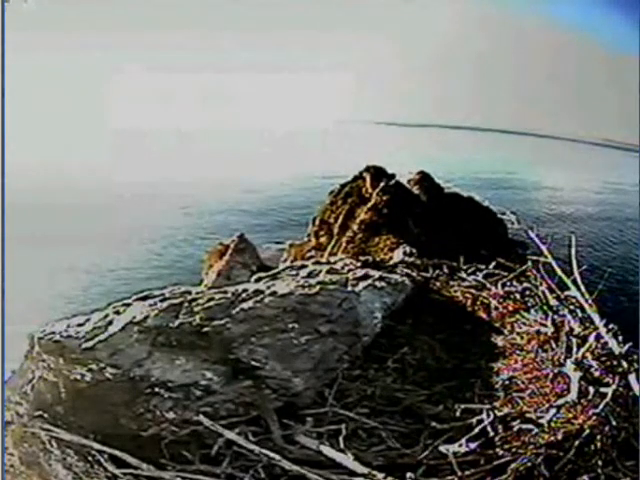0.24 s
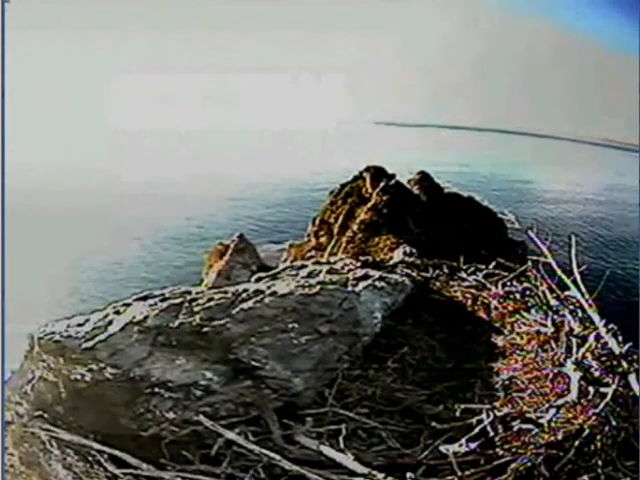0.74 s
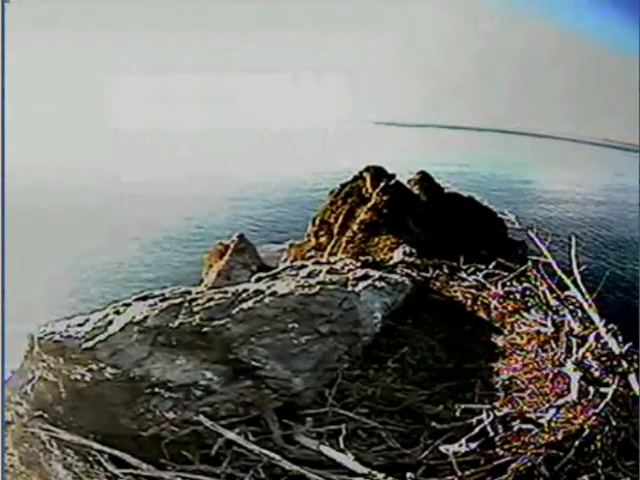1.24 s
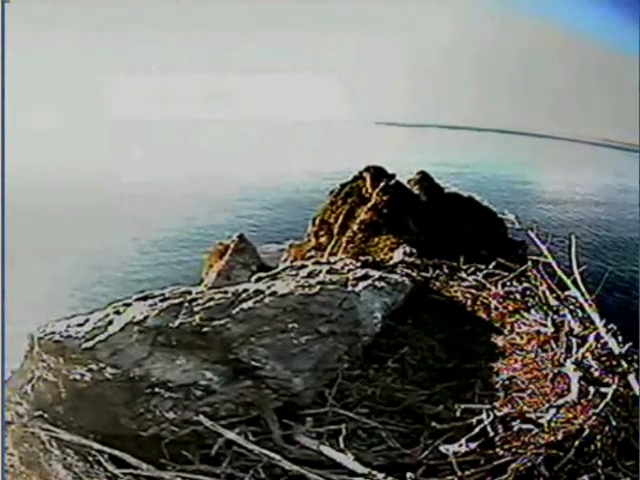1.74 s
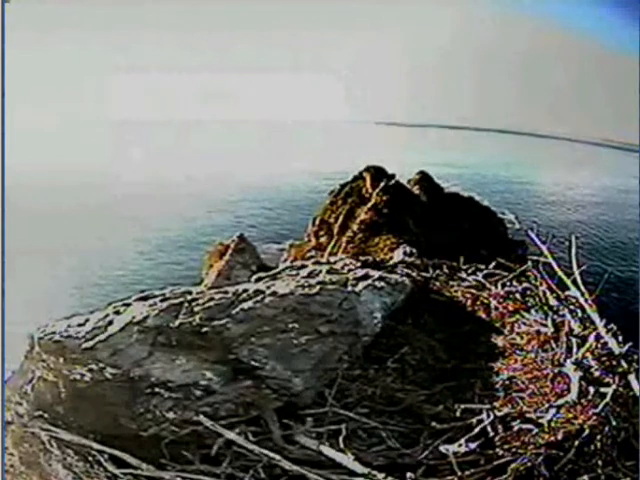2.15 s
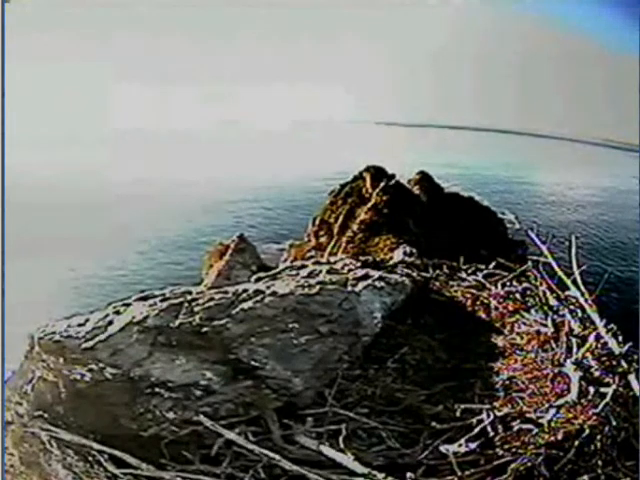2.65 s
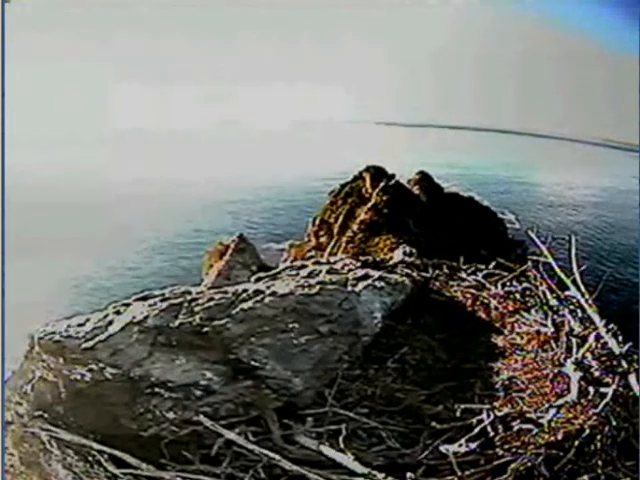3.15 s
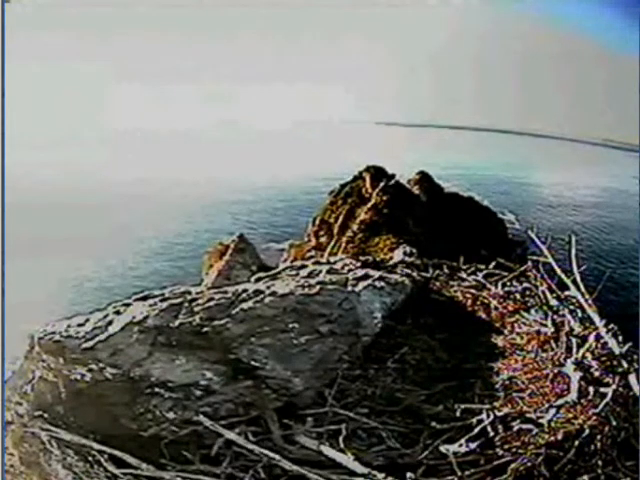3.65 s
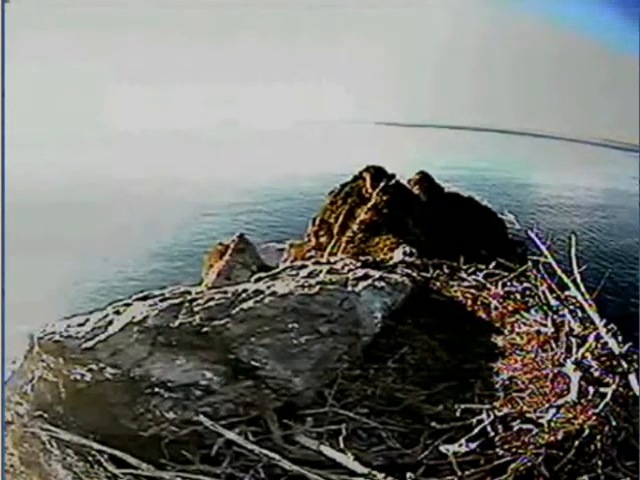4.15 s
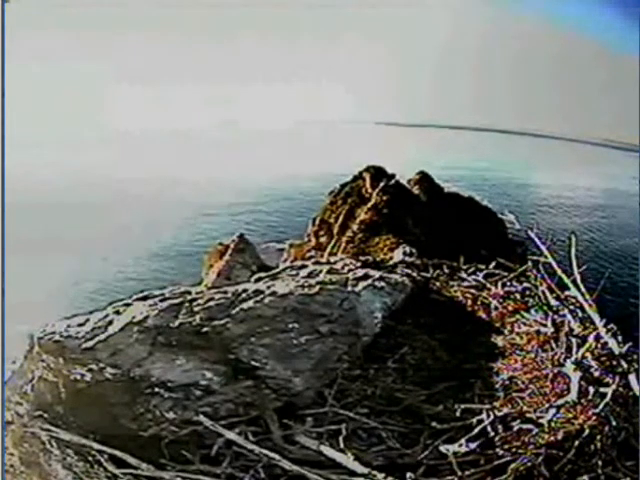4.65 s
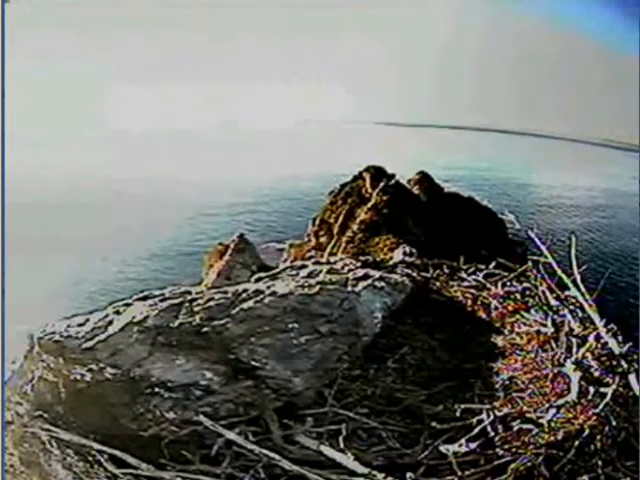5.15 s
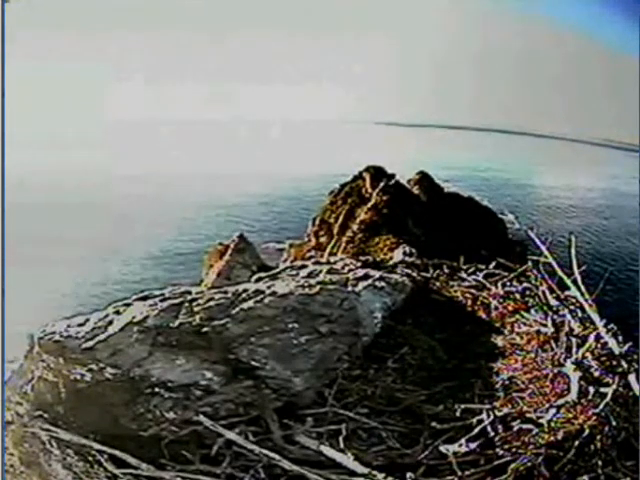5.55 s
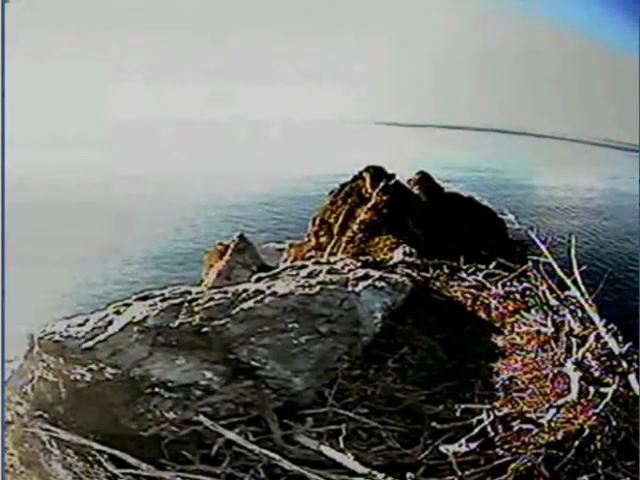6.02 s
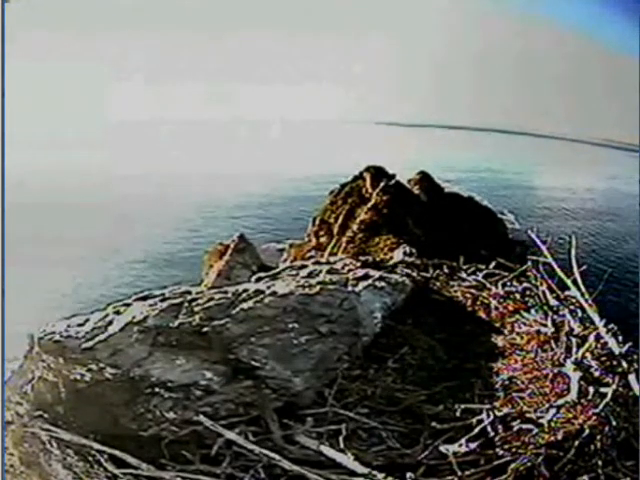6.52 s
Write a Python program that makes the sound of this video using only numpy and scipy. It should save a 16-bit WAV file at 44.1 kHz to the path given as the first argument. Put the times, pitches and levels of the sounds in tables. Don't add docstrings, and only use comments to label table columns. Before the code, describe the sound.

Two eagles swap thin high chirps and jumping whistles in quick runs over steady surf hiss, after one abrupt noisy blare near the start.

```python
import sys
import numpy as np
from scipy import signal
from scipy.io import wavfile
from scipy.ndimage import uniform_filter1d, minimum_filter1d

SR = 44100
rng = np.random.default_rng(int(sys.argv[2]) if len(sys.argv) > 2 else 0)


def wrap_up_sound(samples):
    columns = np.atleast_2d(samples).T
    tamed = np.clip(columns, -1, 1)
    steps = np.round(tamed * 32767).astype(np.int16)
    wavfile.write(sys.argv[1], SR, steps)


def volts_from_db(level):
    exponent = np.asarray(level, float) / 20
    return 10 ** exponent


N = 298998


def evened(x):
    return x / np.sqrt(np.mean(x ** 2) + 1e-20)


def read(points, hz):
    f, value = np.transpose(points)
    return np.interp(np.log(hz + 1), np.log(f + 1), value)


def add(mix, s, sound):
    part = mix[round(s * SR):][:len(sound)]
    part += sound[:len(part)]


def swing(s, per_s):
    return np.sin(2 * np.pi * (per_s * rng.uniform(.5, 1) * s + rng.random()))


def noise(spectrum, patchy_db, swell_db):
    frames, hz = N // 256 + 5, np.fft.rfftfreq(1024, 1 / SR)
    real, imaginary, patches = rng.standard_normal((frames, 513, 3)).T
    patches = uniform_filter1d(patches, size=8, axis=0)
    patches = evened(uniform_filter1d(patches, size=10, axis=1))
    swell = evened(uniform_filter1d(rng.standard_normal(frames), size=12))
    level_db = read(spectrum, hz)[:, None] + patchy_db * patches + swell_db * swell
    spectra = (real + 1j * imaginary) * volts_from_db(level_db)
    return evened(signal.istft(spectra, nperseg=1024, noverlap=768)[1][:N])


def note(rows, waver=.003, edge_s=.002):
    s, hz, *partial_db = np.transpose(rows)
    t = np.arange(s[0], s[-1], 1 / SR)
    wobble = evened(uniform_filter1d(rng.standard_normal(SR), size=200))[:len(t)]
    turns = np.cumsum(np.interp(t, s, hz) * (1 + waver * wobble)) / SR
    tone = np.zeros(len(t))
    for k, db in enumerate(partial_db, start=1):
        tone += volts_from_db(np.interp(t, s, db)) * np.sin(2 * np.pi * k * turns)
    edges = np.clip(np.minimum(t - s[0], s[-1] - t) / edge_s, 0, 1)
    return s[0], np.sqrt(2) * tone * edges


# pitch_hz, density_db (per Hz)
RUMBLE = [(8.8, -30.5), (15, 0), (19, -2), (22, -13), (32, -1.5), (65, -19), (200, -13.5), (260, -39),
          (440, -120)]
RUMBLE_DB = -49


def wind_rumble():
    return volts_from_db(RUMBLE_DB) * noise(RUMBLE, patchy_db=2.0, swell_db=-1.5)


# time_s, level_db
SURF_LEVEL = [
    [(0.0, -36), (0.34, -35)],
    [(0.42, -36.5), (0.52, -38), (1.91, -37), (2.19, -36.5), (2.76, -36.5), (3.31, -36), (3.71, -36.5),
     (3.93, -37.5), (5.04, -38.5), (5.5, -38.5), (6.37, -41), (6.78, -40.5)],
]


def surf_db(t):
    return np.interp(t, *np.transpose(SURF_LEVEL[0] + SURF_LEVEL[1]))


# pitch_hz, density_db (per Hz)
SURF = [(140, -40.5), (240, -8.5), (406, -6), (517, -8), (885, -5), (1180, 2.5), (1540, -9.5), (1670, -16),
        (2760, -16), (3110, -10.5), (3590, -29), (4200, -32.5), (5460, -61.5), (9240, -120)]
# time_s, pitch_hz, level_db
HOUSING_RING = [
    [(.363, 1140, -27), (.368, 1180, -6), (.3725, 1190, -22)],
    [(.3735, 1250, -15), (.377, 1250, -11), (.3858, 1230, -11)],
]
# start_s, end_s, gain_db
BLARE = (.3626, .3858, 20.6)


def surf():
    sea = volts_from_db(surf_db(np.arange(N) / SR)) * noise(SURF, patchy_db=0.8, swell_db=0.61)
    for rows in HOUSING_RING:
        s, ring = note(rows, waver=0.02, edge_s=0.0057)
        add(sea, s, ring * volts_from_db(-BLARE[2]))
    return sea


# pitch_hz, overtone_db (over the first partial)
SECOND_PARTIAL = [(1300, -2.5), (1900, 1.5), (2150, -23.5), (2450, -23.5), (2700, -31), (2800, -20),
                  (3220, -22), (3340, -43)]
THIRD_PARTIAL = [(1300, -18), (1900, -8.5), (2250, -41.5)]
# start_s, end_s
FACING_AWAY = (3.0, 4.5)
AWAY_ABOVE_HZ, AWAY_DB_PER_KHZ = 3500, -7.5
BEAK_WANDER_DB, BEAK_PER_S = 1, 22


def voiced(s, hz, db, beak_db=None):
    if beak_db is None:
        beak_db = BEAK_WANDER_DB * swing(s, BEAK_PER_S)
    away = AWAY_DB_PER_KHZ / 1000 * (FACING_AWAY[0] < s[0] < FACING_AWAY[1])
    second_db = away * np.maximum(2 * hz - AWAY_ABOVE_HZ, 0) + db + beak_db + read(SECOND_PARTIAL, hz)
    third_db = away * np.maximum(3 * hz - AWAY_ABOVE_HZ, 0) + db + beak_db + read(THIRD_PARTIAL, hz)
    return np.transpose([s, hz, db, second_db, third_db])


# start_s, end_s, from_hz, to_hz, level_db
FAR_WHISTLES = [
    (0.481, .87, 5380, 5340, -68),
    (4.373, 4.71, 5420, 5380, -67.5),
    (6.293, 6.654, 5450, 5180, -67),
]
# start_s, end_s, from_hz, to_hz, level_db
WHISTLES = [
    (1.634, 1.68, 3206, 3060, -38.5),
    (1.681, 1.753, 3210, 3310, -35.5),
    (2.281, 2.308, 1270, 1280, -37.5),
    (2.295, 2.324, 1330, 1320, -36),
    (2.321, 2.345, 2290, 2280, -41),
    (3.111, 3.268, 1275, 1326, -41),
    (3.914, 4.044, 1322, 1360, -39),
    (4.047, 4.147, 1936, 2030, -45),
    (5.985, 6.019, 3330, 3490, -41.5),
]
ATTACK_S, RELEASE_S, SILENT_DB = .011, .009, -14.5
SWELL_DB, BEND = 2.5, 2.2
SCOOP, SCOOP_S, SCOOP_BELOW_HZ = .07, 0.01, 1500
FLUTTER_DB, FLUTTER_PER_S = 2.0, 45


def whistle(start, end, from_hz, to_hz, db):
    u = np.linspace(0, 1, num=41)
    t = u * (end - start)
    edge = np.clip(np.minimum(t / ATTACK_S, (t[-1] - t) / RELEASE_S), 0, 1)
    scoop = SCOOP * np.exp(-t / SCOOP_S) * (from_hz < SCOOP_BELOW_HZ)
    hz = from_hz * (1 - scoop) + (to_hz - from_hz) * u ** BEND
    breath_db = SWELL_DB * (u - .5) + FLUTTER_DB * swing(t, FLUTTER_PER_S)
    return voiced(start + t, hz, db + breath_db + SILENT_DB * (1 - edge) ** 2)


# start_s, held_s, pitch_hz, level_db, flick_db
ENDINGS = [
    (1.92, 0.051, 1905, -48.5, -35.5),
    (3.488, 0.0051, 2390, -57, -29.5),
    (4.136, 0.037, 2380, -37.5, -32),
]
FLICK_S, FLICK_FADE_S, FLICK_HZ_PER_S, FLICK_FADE_DB = .02, .014, 8000, -22


def ending(start, held, hz, db, flick_db):
    attack = min(ATTACK_S, held / 2)
    s = np.cumsum([start, attack, held - attack, FLICK_S, FLICK_FADE_S])
    drop_hz = FLICK_HZ_PER_S * np.maximum(s - start - held, 0)
    return voiced(s, hz - drop_hz, np.array([db + SILENT_DB, db, db, flick_db, flick_db + FLICK_FADE_DB]))


# start_s, length_s, from_hz, to_hz, peak_db
CHIPS = [(1.56, .017, 2866, 2690, -24.5), (1.572, 0.018, 2740, 2920, -25.5),
         (1.617, 0.024, 2710, 2740, -40), (2.588, 0.017, 2930, 2980, -38), (3.263, 0.018, 3170, 3110, -32),
         (4.045, 0.025, 3350, 3270, -41), (5.505, 0.028, 2700, 2670, -30), (5.527, .016, 3240, 3000, -37.5),
         (5.897, 0.015, 2970, 2680, -34), (5.905, 0.015, 2950, 3260, -41), (6.3, 0.02, 2830, 2850, -35.5),
         (6.385, 0.026, 3260, 3390, -34), (6.406, 0.032, 3470, 3470, -33.5),
         (6.421, 0.025, 2915, 2890, -41), (6.714, 0.03, 2793, 2790, -25), (6.744, 0.027, 2800, 2750, -43)]
# start_db, end_db
CHIP_BEAK = (-5.5, 9)
CHIP_PEAK, RISING_PEAK = .3, 0.58
CHIP_START_DB, CHIP_END_DB = -22, -21


def chip(start, length, from_hz, to_hz, db):
    u = np.linspace(0, 1, num=21)
    peak = RISING_PEAK if to_hz > 1.015 * from_hz else CHIP_PEAK
    rise_db = CHIP_START_DB * (1 - u / peak) ** 2
    fall_db = CHIP_END_DB * (abs(u - peak) / (1 - peak)) ** 1.15
    shape_db = np.where(u < peak, rise_db, fall_db)
    hz = from_hz + (to_hz - from_hz) * u
    return voiced(start + u * length, hz, db + shape_db, beak_db=np.interp(u, (0, 1), CHIP_BEAK))


# time_s, pitch_hz, effort_db, beak_db (opening, as overtone level)
LONG_NOTES = [
    [(1.742, 2460, -45, 3), (1.76, 2440, -27, 0), (1.812, 2432, -27, 4.5), (1.835, 2405, -28, -8.5),
     (1.855, 2356, -32.5, 12), (1.886, 2304, -31, 1), (1.916, 2320, -35, -2), (1.93, 2340, -45, 0)],
    [(2.338, 1850, -50, 1), (2.35, 1810, -41.5, 0.5), (2.37, 1788, -38, -1), (2.43, 1811, -39, 0.5),
     (2.5, 1880, -50.5, 6), (2.576, 1912, -43.5, -3), (2.598, 1950, -42, -5)],
    [(2.591, 2395, -38, -19), (2.6, 2398, -27, -9), (2.625, 2416, -26, -9), (2.69, 2435, -29, 0),
     (2.75, 2430, -25.6, -7), (2.772, 2440, -25.3, -7), (2.787, 2350, -28.5, -5), (2.799, 2165, -27.5, -6),
     (2.805, 2180, -50, 3)],
    [(3.266, 1830, -61, 0), (3.278, 1845, -50, 1.5), (3.3, 1865, -52, 2), (3.398, 1933, -45, -0.5),
     (3.444, 2000, -41.5, 7), (3.458, 2000, -60, -3)],
]


def eagles():
    calls = np.zeros(N)
    notes = [whistle(*row) for row in WHISTLES + FAR_WHISTLES]
    notes += [ending(*row) for row in ENDINGS]
    notes += [voiced(*np.transpose(rows)) for rows in LONG_NOTES]
    notes += [chip(*row) for row in CHIPS]
    for rows in notes:
        add(calls, *note(rows))
    return calls + volts_from_db(-26) * np.roll(calls, round(.011 * SR))


def scene():
    return (eagles() + surf() + wind_rumble())[None]


# pitch_hz, density_db (per Hz)
HISS = [(20, 8), (300, 0), (2000, -11.5), (3300, 12), (3800, 0), (5400, 4), (7500, 2)]
HISS_DB = -51.5


def link_hiss():
    return volts_from_db(HISS_DB) * noise(HISS, patchy_db=2.0, swell_db=0.5)


def coarse_rounding(x, size, band, under_sea_db, shadow_db, count):
    n = np.arange(2 * size)[:, None]
    k = np.arange(*(np.array(band) * 2 * size // SR // 8 * 8))
    window = np.sin(np.pi * (n + .5) / (2 * size))
    basis = window * np.cos(np.pi / size * (n + .5 + size / 2) * (k + .5)) * np.sqrt(2 / size)
    halves = np.pad(x, (size, 2 * size - N % size)).reshape(-1, size)
    c = np.hstack([halves[:-1], halves[1:]]) @ basis
    level_db = 10 * np.log10(uniform_filter1d(c ** 2, size=5, axis=1) + 1e-20)
    loudest_db = -minimum_filter1d(-level_db, size=count, axis=1, origin=count // 2)
    wander = uniform_filter1d(rng.standard_normal((len(c), len(k) // 8)), size=3, axis=0)
    wander = evened(wander).repeat(8, axis=1)
    sea_db = surf_db(np.arange(len(c)) * size / SR)[:, None]
    floor_db = .5 * sea_db - under_sea_db + 3.5 * wander
    step = volts_from_db(np.maximum(loudest_db - shadow_db, floor_db))
    error = (step * np.round(c / step) - c) * (k >= k[0] + count)
    frames = error @ basis.T
    return x + (frames[1:, :size] + frames[:-1, size:]).ravel()[:N]


# pitch_hz, density_db (per Hz)
LEAK = [(6000, -30), (7800, 0), (10500, -3.5), (11000, -11.5), (14000, -11.5)]
LINK_EDGE_HZ, OFFSET = 7700, 0.0071


def overload(link):
    low_pass = signal.firwin(801, LINK_EDGE_HZ, window=("kaiser", 8), fs=SR)
    link = signal.oaconvolve(link, low_pass, "same")
    return np.clip(link + OFFSET, -.09, .085) + volts_from_db(-91.0) * noise(LEAK, patchy_db=1.5, swell_db=0.0)


# time_s, level_db
SEAMS = [(0.5137, -66), (0.9138, -65), (1.3139, -60), (2.4339, -55), (3.234, -58), (3.5538, -66),
         (3.9539, -60), (4.3544, -77), (4.6743, -69), (5.0744, -64), (5.3941, -70), (5.7944, -75),
         (6.1944, -77), (6.5146, -64)]


def seam_ticks():
    ticks = np.zeros(N)
    for s, db in SEAMS:
        add(ticks, s, volts_from_db(db + 15.5) * np.ones(1))
    return ticks


def mirrored(link):
    mirror = link * (-1.) ** np.arange(N)
    mirror = signal.oaconvolve(mirror, signal.firwin(401, SR / 4, pass_zero=False, fs=SR), "same")
    return signal.oaconvolve(link + volts_from_db(-5) * mirror, signal.firwin(401, 15830, fs=SR), "same")


def blare_gain():
    t = np.arange(N) / SR
    start, end, db = BLARE
    return uniform_filter1d(volts_from_db(db * ((t > start) & (t < end))), size=3)


def top_cut(x):
    return signal.sosfilt(signal.butter(12, 16890, fs=SR, output="sos"), x)


def record(dry):
    link = dry[0] + link_hiss()
    link = coarse_rounding(link, 1024, (2400, 8000), under_sea_db=29, shadow_db=16, count=55)
    link = overload(link) + seam_ticks()
    both = mirrored(link)
    both = coarse_rounding(both, 2048, (7500, 14300), under_sea_db=56, shadow_db=5, count=21)
    mix = (both * blare_gain())[None]
    return top_cut(mix)


dry = scene()
out = record(dry)
wrap_up_sound(out)
```